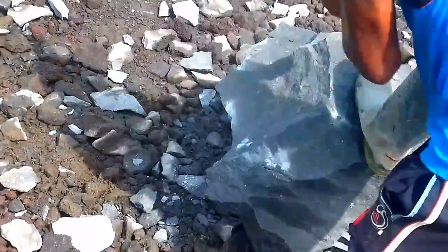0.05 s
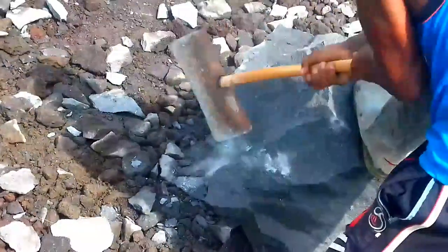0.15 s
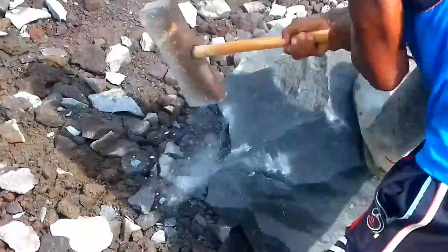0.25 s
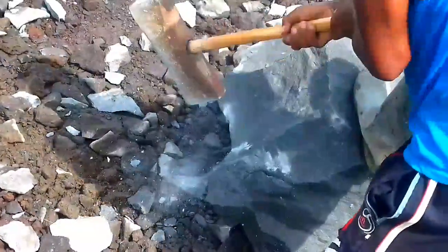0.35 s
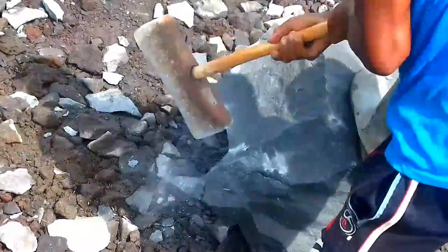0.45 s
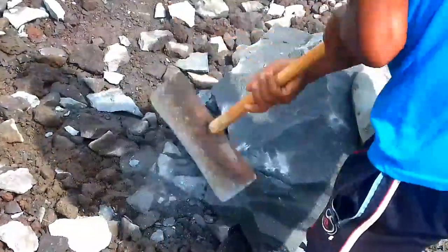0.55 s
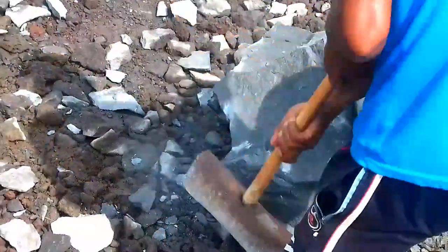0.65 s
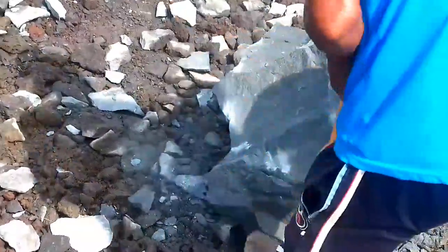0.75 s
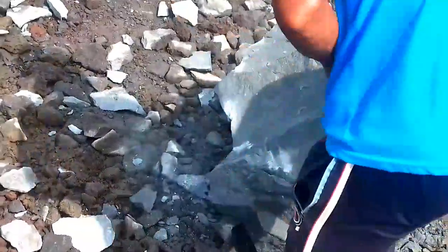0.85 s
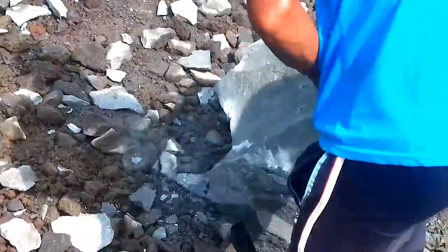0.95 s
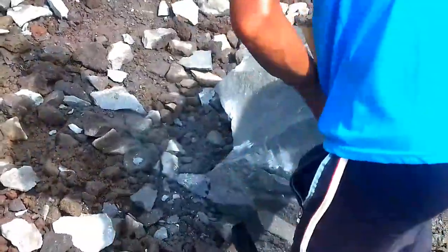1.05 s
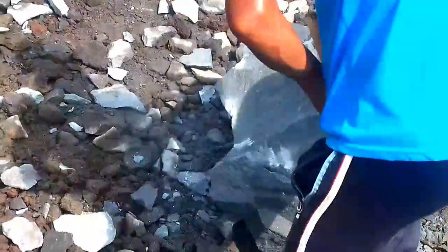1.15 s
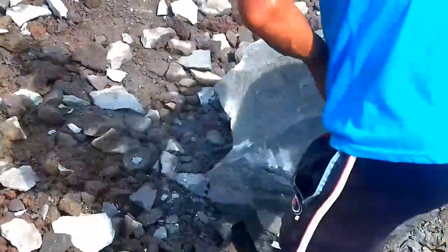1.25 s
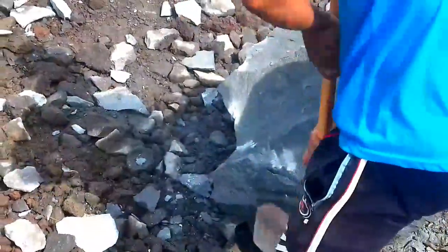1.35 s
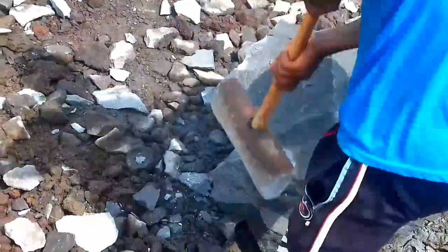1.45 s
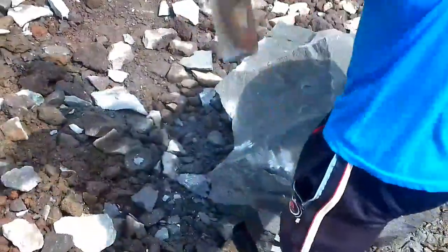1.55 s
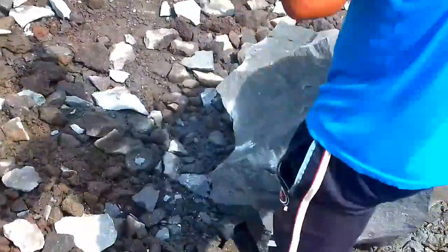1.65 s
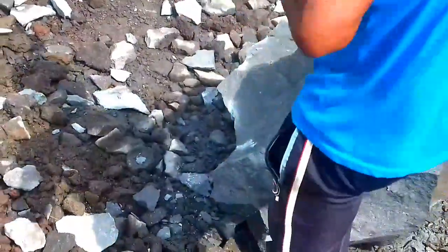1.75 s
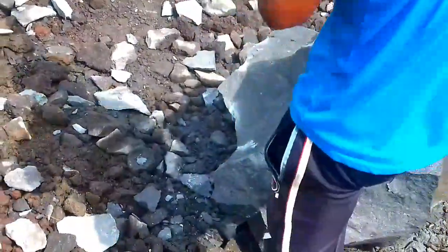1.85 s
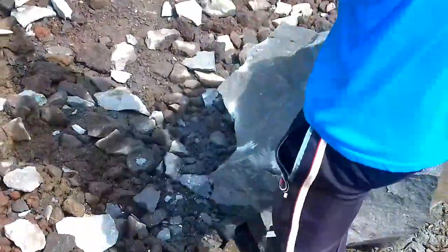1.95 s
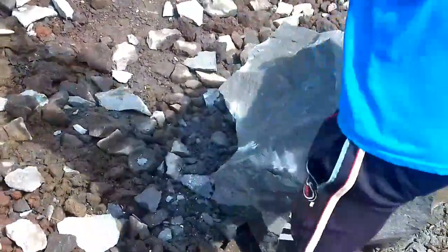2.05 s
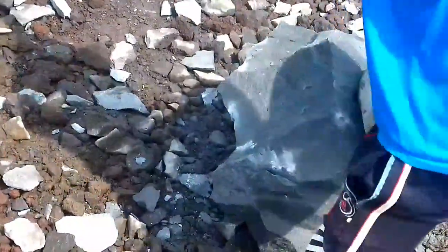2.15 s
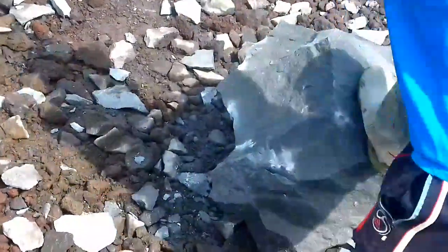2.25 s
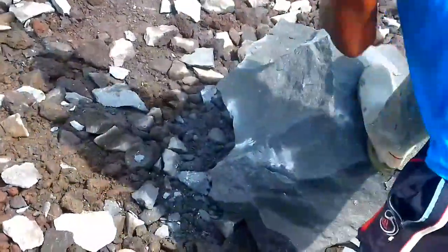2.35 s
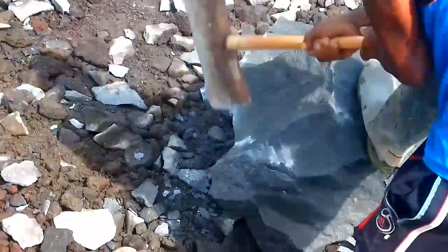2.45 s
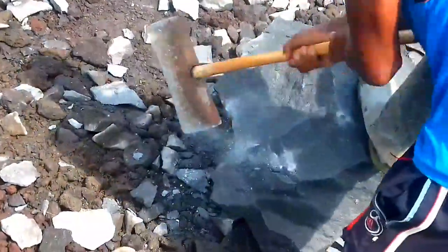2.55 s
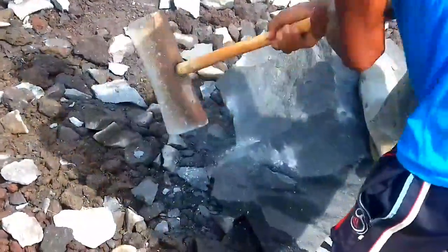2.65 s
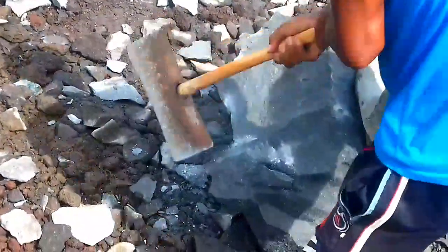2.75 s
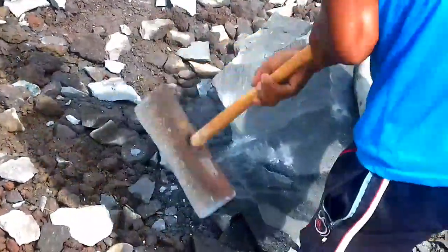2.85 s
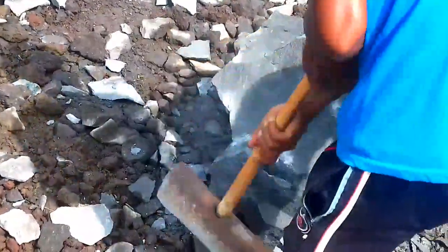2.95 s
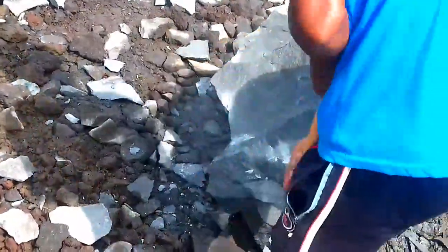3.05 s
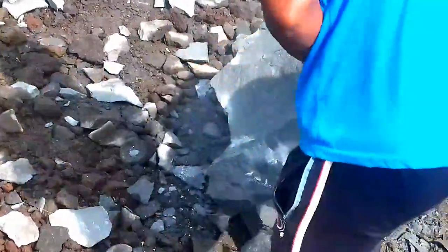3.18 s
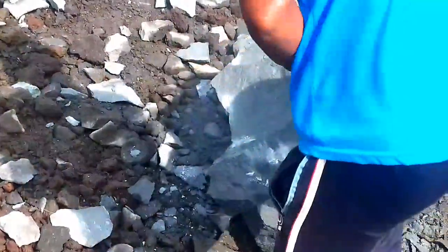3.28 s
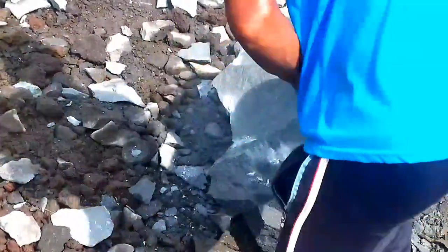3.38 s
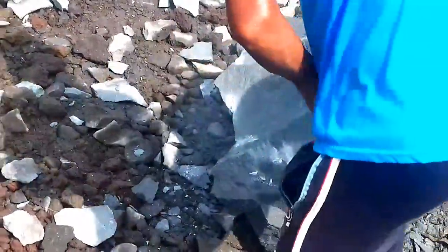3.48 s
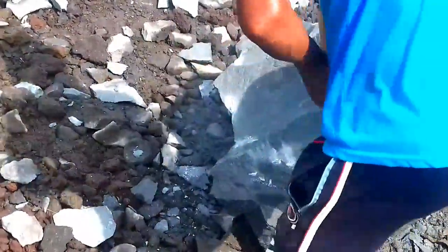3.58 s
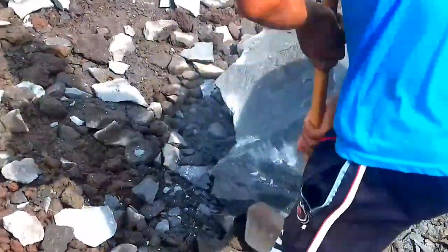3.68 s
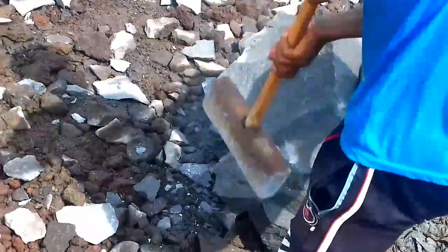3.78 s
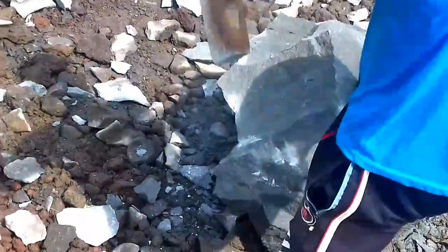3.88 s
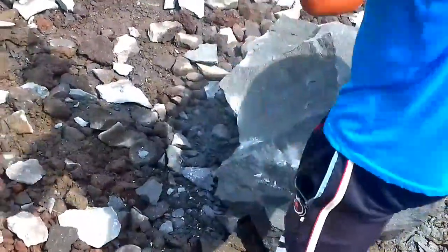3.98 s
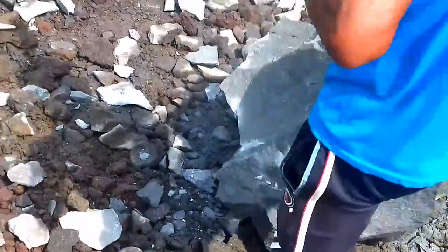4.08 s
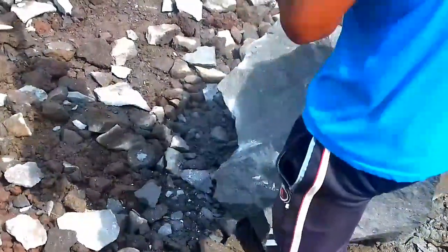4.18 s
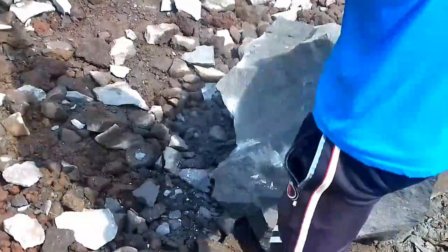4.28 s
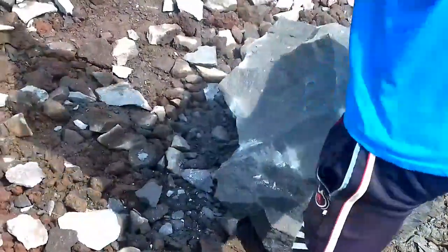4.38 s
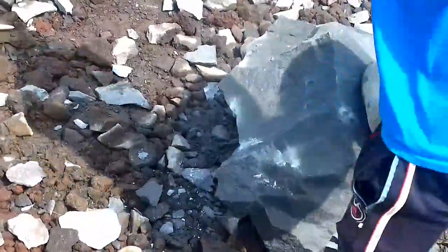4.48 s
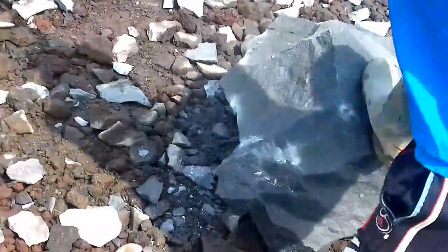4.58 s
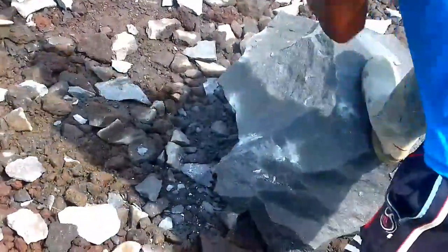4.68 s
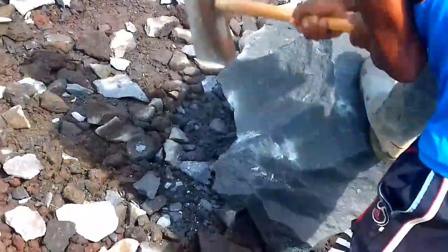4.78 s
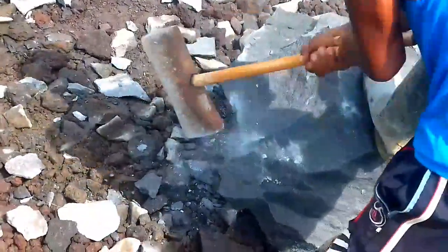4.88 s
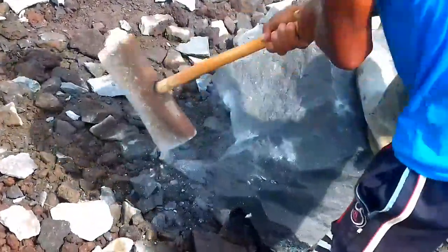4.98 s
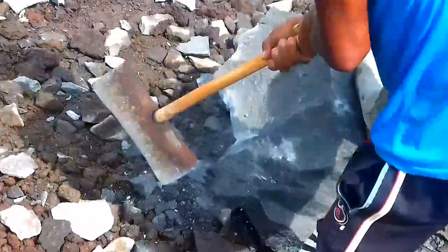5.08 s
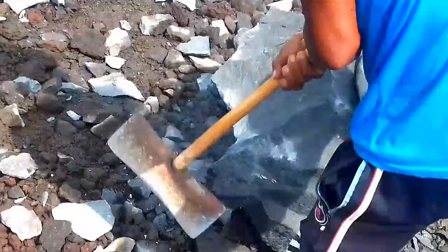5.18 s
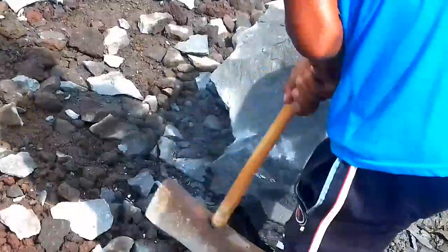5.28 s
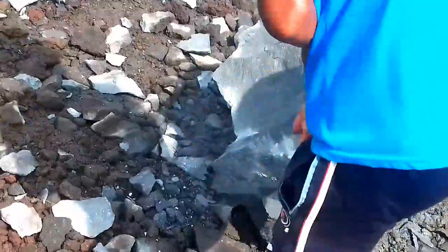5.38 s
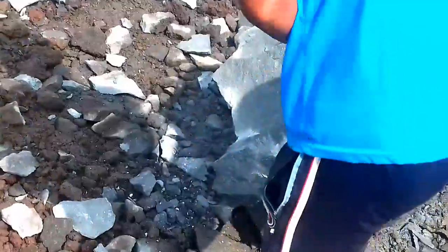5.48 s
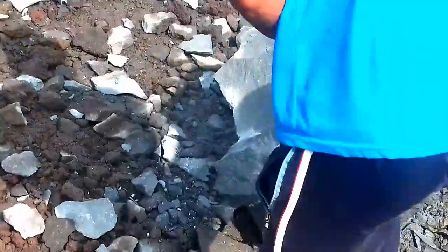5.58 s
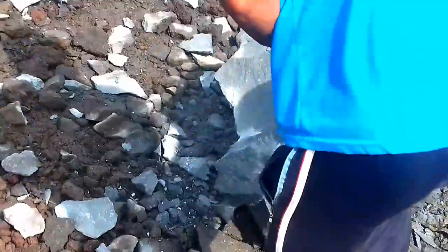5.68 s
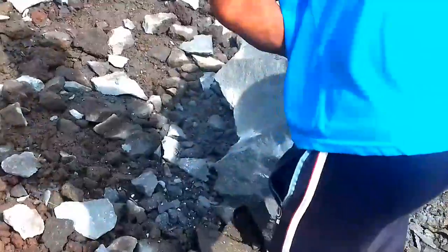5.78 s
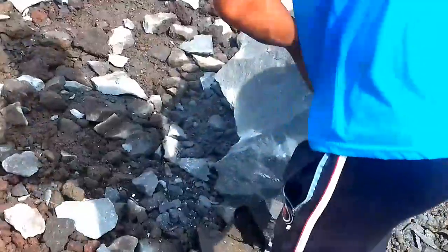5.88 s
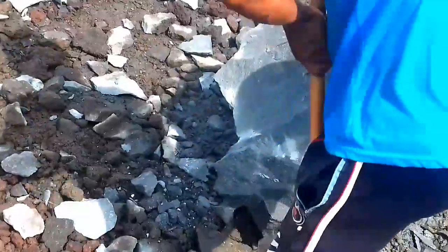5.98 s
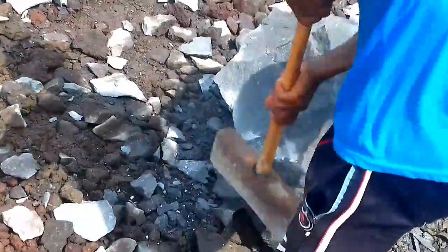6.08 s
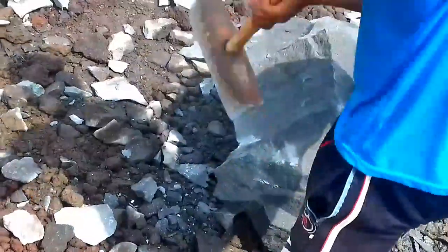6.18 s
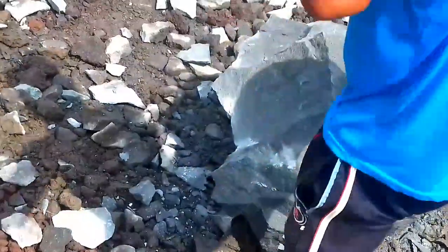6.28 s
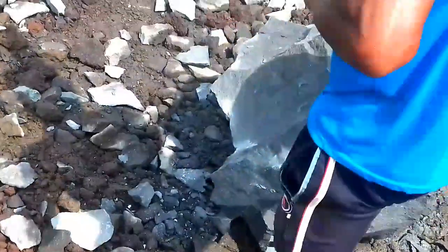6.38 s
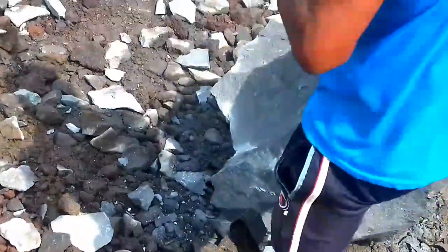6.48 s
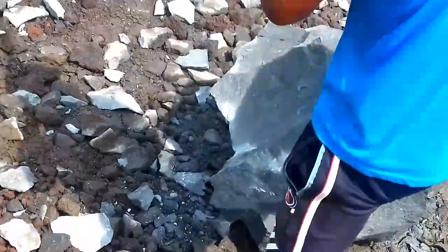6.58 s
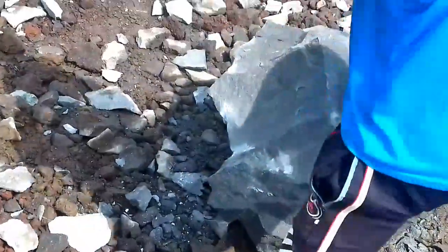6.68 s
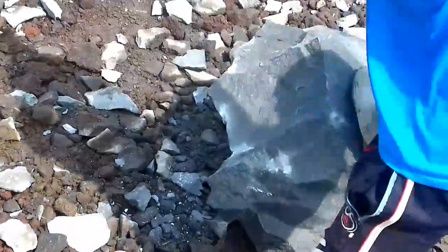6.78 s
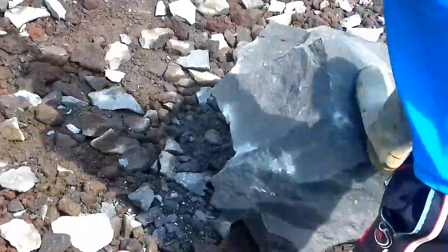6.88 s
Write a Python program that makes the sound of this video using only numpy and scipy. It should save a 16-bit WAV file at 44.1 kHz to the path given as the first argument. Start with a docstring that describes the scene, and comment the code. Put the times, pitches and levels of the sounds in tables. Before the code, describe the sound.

Heavy sledgehammer blows crack on a boulder with a ringing steel head, sharp chisel clinks between them, and a distant machine drones underneath.

```python
"""Sledgehammer and chisel in a quarry

Three sledge blows overload the microphone: noise bursts for the boulder, decaying sines for the steel head.
The head's long tone beats with its echo. Between blows a chisel cracks, knocks and rings against stone.
Chips patter on gravel as short noise bursts. A far machine drones in wavering sines over rumble and hiss;
this background sinks after each heavy blow and swells back."""
import sys
import numpy as np
from scipy import signal
from scipy.fft import rfft, irfft
from scipy.io import wavfile

SR = 44100
rng = np.random.default_rng(int(sys.argv[2]) if len(sys.argv) > 2 else 0)


def transcribe(u):
    """Save the signal u as a 16-bit wav file named by the first command-line argument.

    u: samples, shape (n,) or (channels, n), limited to [-1, 1]; the rate is SR.
    q: integer samples, one column per channel.
    """
    v = np.clip(np.atleast_2d(u).T, -1, 1)
    q = np.round(v * 32767).astype(np.int16)
    wavfile.write(sys.argv[1], SR, q)


N = 305613  # length in samples


def amp(db):
    """Decibels to gain."""
    return 10 ** (np.asarray(db) / 20)


def unit(x):
    """Scales to an rms of 1."""
    return x / np.sqrt(np.mean(x ** 2) + 1e-20)


def read(points, hz):
    """Reads a curve of (Hz, value) points on a log-frequency axis."""
    point_hz, value = np.transpose(points)
    return np.interp(np.log(hz + 1), np.log(point_hz + 1), value)


def level(rows):
    """Gain over the whole time from a dB curve; practically silent outside it."""
    s, db = np.transpose(rows)
    return amp(np.interp(np.arange(N) / SR, s, db, -140, -140))


def add(mix, s, sound):
    """Mixes a sound in at time s."""
    part = mix[max(round(s * SR), 0):][:len(sound)]
    part += sound[:len(part)]


def noise(colour, size):
    """Noise of rms 1 with the given spectrum."""
    hz = np.fft.rfftfreq(size, 1 / SR)
    spectrum = rfft(rng.standard_normal(size)) * amp(read(colour, hz))
    return unit(irfft(spectrum, size))


def wander(rate_hz, size=N):
    """Slow random curve of rms 1, with a soft upper limit on its rate."""
    hz = np.fft.rfftfreq(size, 1 / SR)
    spectrum = rfft(rng.standard_normal(size)) * np.exp(-(hz / rate_hz) ** 2)
    return unit(irfft(spectrum, size))


def burst(colour, rise, hold, t60, tail_db, tail_t60):
    """Stone crushing: a rush of noise while the contact lasts, a fast fall, then uneven crumbs and dust."""
    t = np.arange(SR // 3) / SR
    after = np.maximum(t - hold, 0)
    crush = amp(-60 * after / t60)
    crumbs = amp(tail_db + 2.3 * wander(250, size=len(t))) * amp(-60 * after / tail_t60)
    shape = (1 - np.exp(-t / rise)) * (crush + crumbs)
    sound = noise(colour, len(t)) * shape
    # every burst carries the energy of its envelope, whatever the noise drew
    return sound * np.linalg.norm(shape) / np.linalg.norm(sound)


def ring(modes, rise, detune, flutter_db):
    """Struck steel or stone: decaying modes, retuned a little each time, that flutter as the piece moves."""
    t = np.arange(SR // 2) / SR
    out = np.zeros(len(t))
    for hz, db, t60 in modes:
        decay_db = -60 * t / t60
        flutter = flutter_db * wander(35, size=len(t))
        cycles = hz * (1 + detune * rng.standard_normal()) * t + rng.random()
        out += amp(db + decay_db + flutter) * np.sin(2 * np.pi * cycles)
    return out * (1 - np.exp(-t / rise))


# Sledge blows; crumbs are relative to the thud, low and high offset the head's modes below and above
# its singing tone: start_s, thud_db, crumbs_db, crack_db, low_db, high_db, sing_db, rebound_m_per_s
BLOWS = [(0.2746, -0.5, -15.5, -14.5, -20, -20.5, -27, 0.61),
         (2.6072, -5.5, -13, -11.5, -16.5, -19.5, -29, .36),
         (4.9554, -8, -11, -13, -39.5, -26.5, -30.5, 0.28)]
# Short modes of the sledge head: pitch_hz, relative_level_db, t60_s
HEAD_MODES = [(3778, -3, 0.13), (4570, 9, .18), (8000, -17.5, 0.2), (8420, -18.5, 0.16), (9200, -22.5, .34),
              (14160, -40, .22)]
# Colour of the boulder's thud: frequency_hz, relative_density_db
THUD_COLOUR = [(25, -19), (60, -18), (150, -16), (300, -7), (450, 4.5), (640, -8.5), (900, -0.5), (1300, 0),
               (2050, 1.5), (2600, -17.5), (3100, -19), (4200, -16), (6500, -42.5), (16000, -59)]
# Colour of the crack, shared by sledge and chisel: frequency_hz, relative_density_db
CRACK_COLOUR = [(200, -37), (2000, -28), (2800, -23), (3250, -14), (3700, 4.5), (4200, 0.5), (5000, -0.5),
                (6200, -16.5), (7500, -20.5), (10000, -28.5), (15000, -31.5)]
# Moments when the swinging head turns away and its tone drops: centre_s, half_length_s, depth_db
TURNS = [(0.387, 0.0084, -4.5), (.645, 0.021, -18), (0.848, 0.032, -20), (1.203, 0.12, -15),
         (2.715, 0.02, -11), (3.19, 0.052, -12), (3.552, 0.1, -9.5), (5.307, 0.036, -8.5),
         (5.515, 0.018, -9), (5.997, 0.04, -10.5)]
SING_HZ = 5433  # the head's one long mode


def sledge():
    """The boulder thuds and cracks, and the head rings as it bounces clear and is swung away."""
    out, singing, t = np.zeros(N), np.zeros(N), np.arange(N) / SR
    for s, thud_db, crumbs_db, crack_db, low_db, high_db, sing_db, rebound in BLOWS:
        thud = burst(THUD_COLOUR, rise=0.0004, hold=0.0013, t60=0.024, tail_db=crumbs_db, tail_t60=0.11)
        crack = burst(CRACK_COLOUR, rise=0.00014, hold=0.0015, t60=0.0047, tail_db=-28.0, tail_t60=0.07)
        modes = [(hz, db + (low_db if hz < SING_HZ else high_db), t60) for hz, db, t60 in HEAD_MODES]
        add(out, s, amp(thud_db) * thud)
        add(out, s, amp(crack_db) * crack)
        add(out, s + 0.003, ring(modes, rise=0.032, detune=0.00063, flutter_db=4.5))
        add(singing, s, amp(sing_db) * sing(rebound))
    turned_db = sum(depth_db * np.exp(-((t - s) / length) ** 2) for s, length, depth_db in TURNS)
    return out + singing * amp(turned_db)


# The long mode swells as the head bounces clear; the worker's arms brake the rebound
SING_RISE_S, SING_T60_S, BRAKE_S = 0.022, 1.43, 0.8
ECHO_SHARE = 0.29  # echo's strength beside the direct tone at contact
SOUND_M_PER_S = 343
# The worker's grip finally stills the tone: time after the blow, and how fast
STILL_AFTER_S, STILL_DB_PER_S = 1.1, 150.5


def sing(rebound):
    """The head's long tone beats with its own echo off the boulder, more slowly and faintly as the gap opens."""
    t = np.arange(3 * SR // 2) / SR
    closeness = np.exp(-t / BRAKE_S)
    gap_m = rebound * BRAKE_S * (1 - closeness)
    echo_delay = 2 * gap_m / SOUND_M_PER_S
    direct = np.sin(2 * np.pi * SING_HZ * t)
    echo = ECHO_SHARE * closeness * np.sin(2 * np.pi * SING_HZ * (t - echo_delay))
    decay_db = -60 * t / SING_T60_S
    grip_db = -STILL_DB_PER_S * np.maximum(t - STILL_AFTER_S, 0)
    flutter_db = 2.7 * wander(26, size=len(t))
    rise = 1 - np.exp(-(t / SING_RISE_S) ** 2)
    return np.sqrt(2) * rise * amp(decay_db + grip_db + flutter_db) * (direct - echo)


# Strokes and light taps on the chisel: start_s, crack_db, knock_db, ring_db, stone_pitch_hz
STROKES = [(2.3157, -13, -27.5, -8.5, 1850), (2.8522, -19, -28, -21, 1350),
           (3.387, -16.5, -32.5, -8.5, 1895), (3.7558, -67, -75, -50, 1950), (4.0745, -15, -23, -22, 2410),
           (4.32, -55, -54, -39.5, 1950), (4.606, -15.5, -21.5, -8, 1673),
           (4.838, -56.5, -67.5, -39.5, 1940), (5.1249, -18, -32.5, -37, 2000),
           (5.356, -61, -69, -51, 1920), (5.642, -19.5, -33, -18, 1947), (5.866, -64, -65, -44, 1930),
           (6.1613, -19, -25.5, -6.5, 1920), (6.3828, -67, -78, -47, 1920), (6.676, -13, -23, -11, 2033)]
# Modes of the hand-held chisel: pitch_hz, relative_level_db, t60_s
CHISEL_MODES = [(3554, -7.5, .06), (3628, -1.5, 0.066), (3674, -5.5, 0.057), (3810, -10, 0.06),
                (4182, -25.5, .06), (7160, -32, 0.065), (8905, -26.5, 0.061), (9320, -37, 0.086),
                (10400, -39, .09), (10600, -44.5, .07), (12950, -45.5, .07), (15150, -43, 0.088)]
# Colour of the knock in the stone: frequency_hz, relative_density_db
KNOCK_COLOUR = [(60, -26), (220, 0.5), (500, -17), (900, -5.5), (1400, -1.5), (2100, 3), (2700, -15),
                (3300, -18.5), (6000, -38.5)]


def chisel():
    """A hard crack of steel on steel, a knock in the stone, and a short beating ring damped by the hand."""
    out = np.zeros(N)
    for s, crack_db, knock_db, ring_db, stone_hz in STROKES:
        crack = burst(CRACK_COLOUR, rise=0.00019, hold=0.003, t60=0.015, tail_db=-18.5, tail_t60=0.1)
        knock = burst(KNOCK_COLOUR, rise=0.0014, hold=0.0032, t60=0.01713, tail_db=-16, tail_t60=0.097)
        stone_note = ring([(stone_hz, 2, 0.028)], rise=0.00044, detune=0.0023, flutter_db=5.5)
        steel = ring(CHISEL_MODES, rise=0.0026, detune=0.0055, flutter_db=3.0)
        add(out, s, amp(crack_db) * crack)
        add(out, s, amp(knock_db) * knock)
        add(out, s, amp(knock_db) * stone_note)
        add(out, s, amp(ring_db) * steel)
    return out


# Stone chips landing: start_s, level_db
CHIPS = [(0.388, -48), (.392, -56), (.677, -69), (0.887, -68), (.968, -77), (2.716, -44.5), (3.3744, -43.5),
         (3.446, -42), (5, -33), (5.035, -40), (5.057, -33.5), (5.074, -40.5), (5.236, -46)]
# Level curve of a scuff on the gravel: time_s, level_db
SCUFF = [(3.22, -75.5), (3.26, -59.5), (3.31, -56), (3.34, -76)]
# Colour of chips and scuff: frequency_hz, relative_density_db
CHIP_COLOUR = [(300, -23.5), (1200, -10), (2100, -0.5), (3000, -22.5), (3800, -2.5), (4700, 3.5),
               (6000, -9), (7500, -27), (15000, -38.5)]


def gravel():
    """Chips tick on the rubble, and something is dragged briefly across it."""
    grains = amp(1.5 * wander(300))
    out = level(SCUFF) * unit(noise(CHIP_COLOUR, N) * grains)
    for s, db in CHIPS:
        chip = burst(CHIP_COLOUR, rise=0.00028, hold=0.0022, t60=0.029, tail_db=-22.0, tail_t60=0.084)
        add(out, s, amp(db) * chip)
    return out


# Decay of the scatter from the rubble: frequency_hz, t60_s
SCATTER = [(200, 0.21), (1500, 0.15), (3700, 0.29), (6000, 0.16), (14000, 0.24)]


def rubble(x):
    """Faint scatter from the stones all around: a noise tail, each band dying at its own speed."""
    hz, t, bands = signal.stft(rng.standard_normal(SR // 2), SR, nperseg=256)
    decay = amp(-60 * t / read(SCATTER, hz)[:, None])
    tail = signal.istft(bands * decay, SR, nperseg=256)[1]
    tail = tail * (1 - np.exp(-np.arange(len(tail)) / SR / 0.0036))  # soft onset
    return signal.fftconvolve(x, tail / np.linalg.norm(tail))[:N]


# Background levels beneath the swells: time_s, rumble_db, hiss_db, deepest_machine_tone_db
QUIET = [(0, -62, -62.5, -75), (0.901, -61, -62, -71), (1.35, -59, -65, -68), (2.1, -59, -63, -68),
         (3.1, -64.5, -64.5, -69), (4.399, -59.5, -63, -74), (5.502, -62, -64, -81), (6.1, -60.5, -65, -85),
         (6.93, -59, -66, -86.5)]
# Colour of the rumble: frequency_hz, relative_density_db
RUMBLE_COLOUR = [(20, -27), (40, -26), (62, -11), (85, 2.5), (130, 1), (210, 1), (300, -1), (420, -7.5),
                 (700, -47.5)]
# Colour of the hiss: frequency_hz, relative_density_db
AIR_COLOUR = [(150, -17.5), (400, -1.5), (650, -5), (1200, -6), (2050, -5), (2450, -11.5), (2750, -20.5),
              (3100, -25.5), (3600, -17), (4400, -16), (5500, -28.5), (7000, -36), (10000, -34.5),
              (15000, -40)]
# Machine tones, the close pair throbs: pitch_hz, level_beside_rumble_db
DRONE = [(102, -10), (203.5, -8), (210.8, -12.5)]
# Thin tones in the hiss: pitch_hz, level_beside_hiss_db
WHINE = [(3445, -20), (3540, -29), (13720, -41)]
RUMBLE_FOLLOWS = 0.87  # dB of swell in the rumble for each dB in the hiss


def quarry():
    """A far machine's drone and rumble under a wide hiss with a thin whine in it, all swelling together."""
    s, *columns = np.transpose(QUIET)
    rumble_db, hiss_db, deep_db = (np.interp(np.arange(N) / SR, s, db) for db in columns)
    rise_db = swell()
    low = noise(RUMBLE_COLOUR, N) + tones(DRONE, waver_hz=3.5, throb_db=3.5)
    hiss = amp(0.5 * wander(11)) * noise(AIR_COLOUR, N)
    high = hiss + tones(WHINE, waver_hz=2.8, throb_db=2.5)
    deep = tones([(51, 0.0052)], waver_hz=0.98, throb_db=1.5)
    low = low * amp(rumble_db + RUMBLE_FOLLOWS * rise_db)
    return low + high * amp(hiss_db + rise_db) + deep * amp(deep_db + rise_db)


def tones(lines, waver_hz, throb_db):
    """Machine tones: sines, each drifting in pitch and strength."""
    out = np.zeros(N)
    for hz, db in lines:
        strength = amp(db + throb_db * wander(32)) * np.sqrt(2)
        cycles = np.cumsum(hz + waver_hz * wander(12)) / SR
        out += strength * np.sin(2 * np.pi * cycles)
    return out


# Swells of the background, each lasting until the next sledge blow: start_s, height_db
SWELLS = [(-.5, 18), (1.53, 21), (3.86, 15.5), (6.03, 16)]
SWELL_RISE_S, SWELL_SINK_S = 0.26, 0.1
# A chisel crack louder than this takes a share off the swell for a moment
DIP_ABOVE_DB, DIP_SHARE, DIP_S = -30, 0.46, 0.35


def swell():
    """The background's rise in dB: it climbs, dips at each hard chisel stroke and sinks after the next blow."""
    t, rise_db = np.arange(N) / SR, np.zeros(N)
    for start, height_db in SWELLS:
        end = min([s for s, *_ in BLOWS if s > start], default=t[-1])
        climb = 1 - np.exp(-np.maximum(t - start, 0) / SWELL_RISE_S)
        sink = np.exp(-np.maximum(t - end, 0) / SWELL_SINK_S)
        rise_db += height_db * climb * sink
    for s, crack_db, *_ in STROKES:
        if crack_db > DIP_ABOVE_DB:
            rise_db *= 1 - DIP_SHARE * (t > s) * np.exp(-((t - s) / DIP_S) ** 2)
    return rise_db


def scene():
    """Everything reaches the microphone nearly alike in both channels, with a trace of width."""
    near, beside = sledge(), chisel()
    scatter = rubble(amp(-27.5) * near + amp(-25.0) * beside)
    mix = near + beside + gravel() + quarry() + scatter
    width = amp(-42) * rubble(mix)
    return np.array([mix + width, mix - width])


EDGE_HZ = 15900  # upper band limit


def record(dry):
    """The blows flatten against the microphone's ceiling; then a low-pass sets the band limit."""
    ceiling = 0.52
    clipped = dry / (1 + (dry / ceiling) ** 8) ** (1 / 8)
    lowpass = signal.firwin(255, EDGE_HZ, window=("kaiser", 9), fs=SR)
    return signal.oaconvolve(clipped, lowpass[None], "same")


dry = scene()
out = record(dry)
transcribe(out)
```